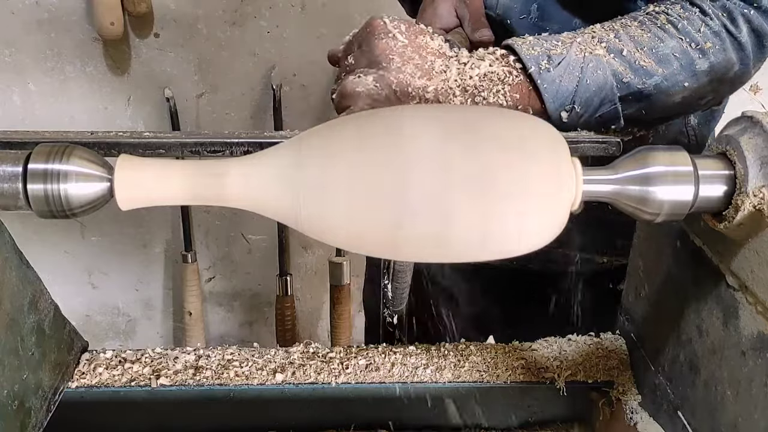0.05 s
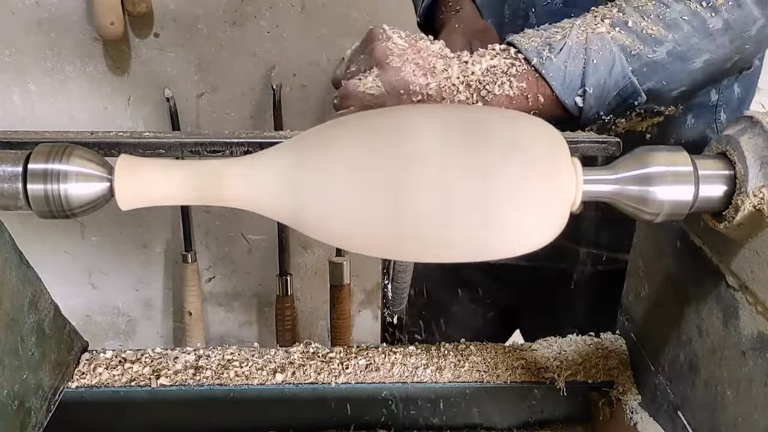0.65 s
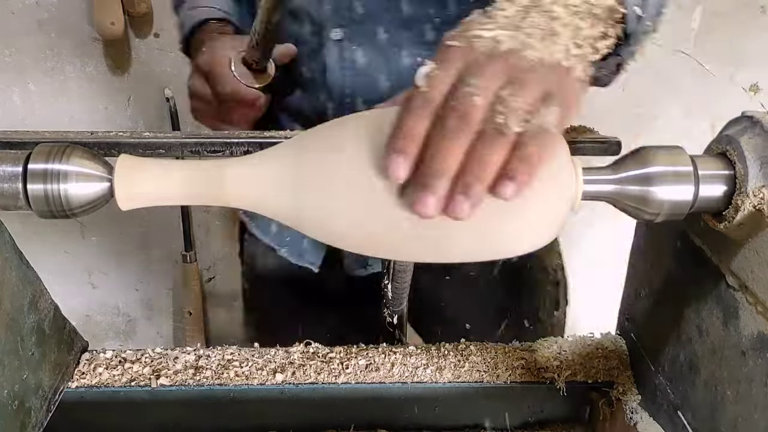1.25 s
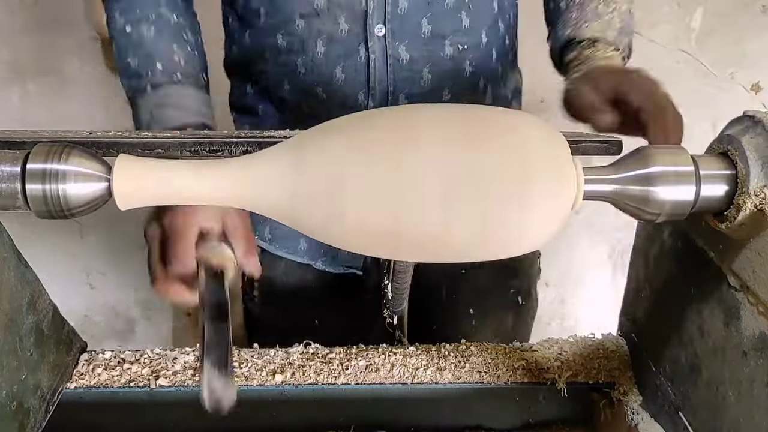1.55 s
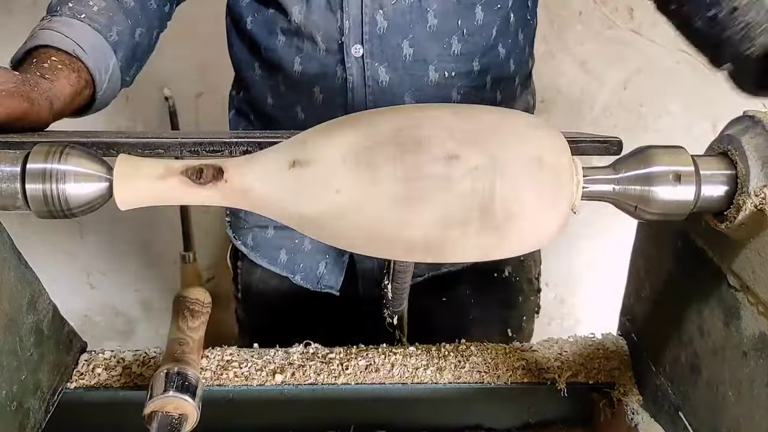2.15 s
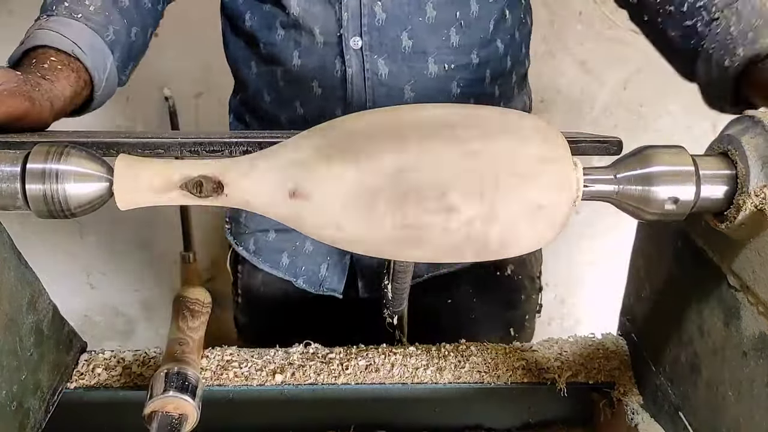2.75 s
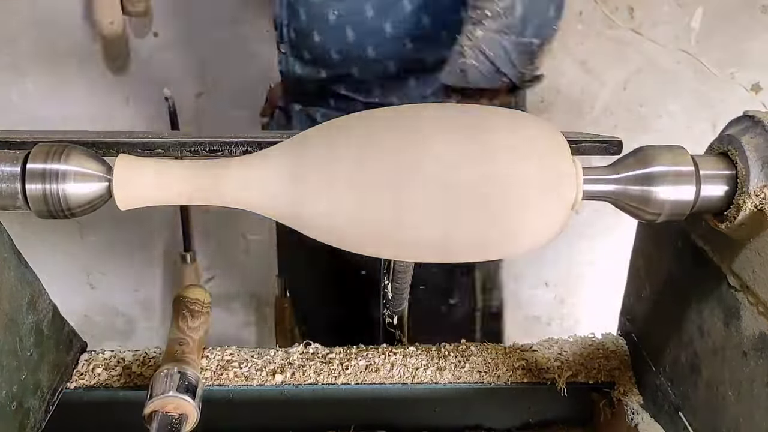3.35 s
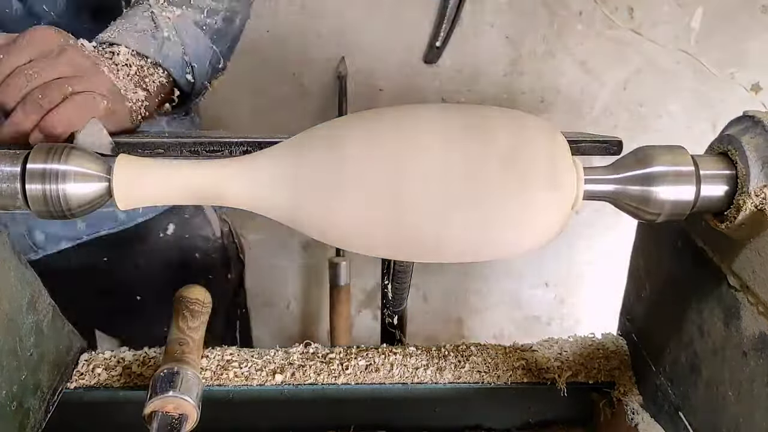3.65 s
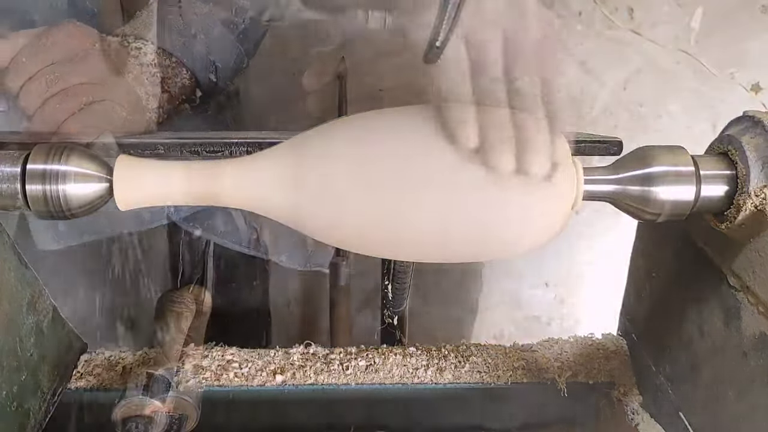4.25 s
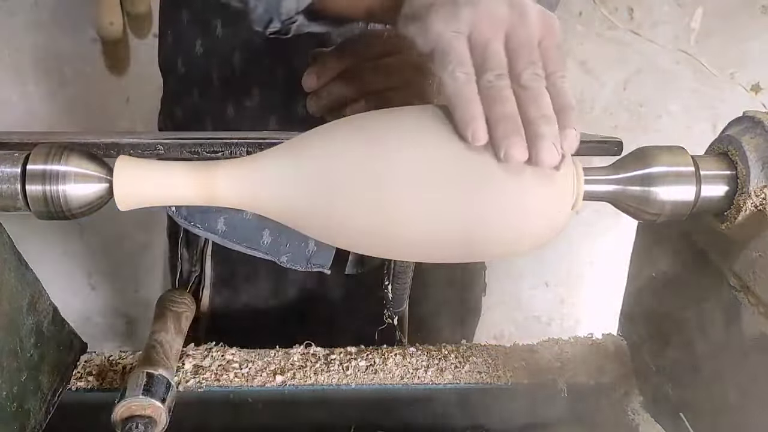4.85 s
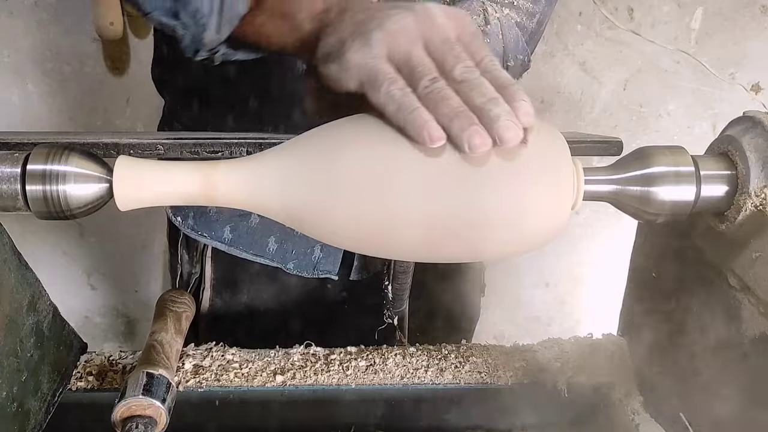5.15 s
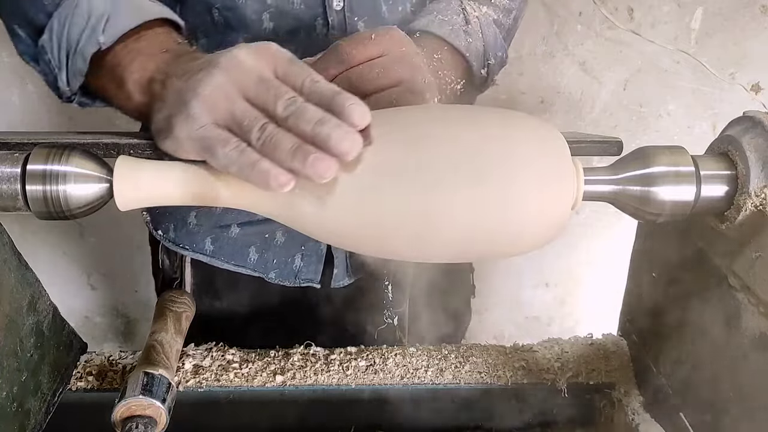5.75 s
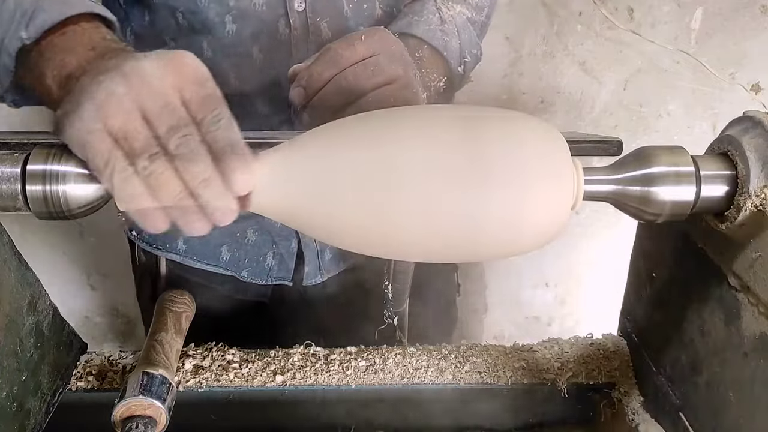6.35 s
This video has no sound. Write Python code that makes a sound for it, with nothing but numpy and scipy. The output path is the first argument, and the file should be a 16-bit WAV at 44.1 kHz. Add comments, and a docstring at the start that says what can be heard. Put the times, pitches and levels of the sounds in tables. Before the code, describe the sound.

Light, hissing chisel cuts sound over the hum and rattle of a wood lathe, heard up close in a small workshop. After one sharp metal clack the machine runs down, leaving dull bumps, faint squeaks and low room noise. It restarts with a brief belt grunt. The wood is scraped twice as a high sandpaper hiss builds, turning shrill under pressure before it softens.

```python
"""A small workshop, close to a belt-driven wood lathe. Its motor hums, its belt and bearings rattle, and
a gouge (a curved chisel) hisses through light cuts. A steel tool is laid down with a clack, the motor is
switched off, and the wood coasts with soft bumps and thin squeaks. The belt grunts as the motor starts
again. The wood is scraped twice and sandpaper hisses along it, over the low noise of the room."""
import sys
import numpy as np
from scipy import signal
from scipy.fft import rfft, irfft
from scipy.io import wavfile
from scipy.ndimage import map_coordinates

SR = 44100
rng = np.random.default_rng(int(sys.argv[2]) if len(sys.argv) > 2 else 0)


def transcribe(u):
    """Save the signal u as a 16-bit wav file named by the first command-line argument.

    u: samples, shape (n,) or (channels, n), limited to [-1, 1]; the rate is SR.
    q: integer samples, one column per channel.
    """
    v = np.clip(np.atleast_2d(u).T, -1, 1)
    q = np.round(v * 32767).astype(np.int16)
    wavfile.write(sys.argv[1], SR, q)


N = 285768
T = np.arange(N) / SR
FREQS = np.maximum(np.arange(N // 2 + 1) * SR / N, 1)
OFF_S, ON_S = 1.775, 3.32  # the motor is switched off, then on again


def motor():
    """Magnetic forces make the motor hum and whine. The tones shift with the load and stop with the power."""
    # the wavering hum after the restart: time_s, level_db
    hum_levels = [(3.33, -41), (3.38, -35.5), (3.7, -43), (3.73, -37), (3.93, -34.5), (3.99, -43),
                  (4.22, -50), (4.27, -35), (4.36, -42), (4.56, -33.5), (4.68, -46), (4.72, -38.5),
                  (5.0, -42), (5.03, -37.5), (5.89, -38.5), (6.01, -44), (6.05, -37.5), (6.25, -47.5),
                  (6.36, -45), (6.48, -52)]
    # weak tones of the frame: pitch_hz, cutting_db, sanding_db, left_lead_rad
    frame_tones = [(62, -66, -58, .3), (398.6, -59, -48, .3), (492, -60, -53, .3), (586.8, -52, -62, .3),
                   (748.5, -63, -54, .3), (841, -57, -50, .3), (852, -49, -62, .3), (869, -42, -60, 2.5),
                   (957, -49, -62, 2.5), (968, -48, -58, .3), (1120, -57, -51, .3), (1152, -60, -54, .3)]
    ramp_s, sanding = 0.025, load()
    power = np.clip(np.maximum(OFF_S - T, T - ON_S) / ramp_s + .5, 0, 1)
    hum_db = np.where(T < (OFF_S + ON_S) / 2, -35.5, curve(hum_levels)[0])
    hum = undb(hum_db) * tone(200.8 - 1.6 * sanding, side_db=5.5, lead=0, wobble=.053, flutter_db=.26)

    def gain(cutting_db, sanding_db):
        return undb(cutting_db) * (1 - sanding) + undb(sanding_db) * sanding

    # the whine of the motor's slots flares at the restart and sinks while the scrapes drag on the wood
    surge = undb(8 * fade(ON_S, t60=.6) * (T > OFF_S + ramp_s))
    drag = undb(-6 * swell(start=3.65, length=1.1))
    whine = gain(-39, -43) * tone(791.3, side_db=5.5, lead=0, wobble=.12, flutter_db=1.4)
    upper_whine = gain(-58, -33.5) * tone(891.4, side_db=5, lead=1.3, wobble=.036, flutter_db=.5)
    belt = gain(-35, -48) * tone(913.5, side_db=5.5, lead=2.4, wobble=.12, flutter_db=.5)
    tones = whine * surge * drag + upper_whine + belt
    for hz, cutting_db, sanding_db, lead in frame_tones:
        tones += gain(cutting_db, sanding_db) * tone(hz, side_db=4.5, lead=lead, wobble=.5, flutter_db=1.3)
    ease_off = undb(-28 * np.maximum(T - 6.15, 0))  # 28 dB a second, near the end
    return (hum + tones * ease_off) * power


def drive():
    """Belt and bearings rattle and ring the metal housing, which throbs with the motor's uneven pull."""
    # tone colour of the rattle: pitch_hz, level_db
    rattle_colour = [(50, -30), (100, -21), (170, -9.5), (290, -8.5), (640, -9), (900, -3.5), (1400, -11.5),
                     (2000, -10), (3400, -14), (4200, -21), (6000, -21), (8500, -18.5), (10500, -67),
                     (15000, -79)]
    # resonances of the housing, running freely and braked by sanding: pitch_hz, width_hz, level_db
    housing_free = [(171, 25, -5), (516, 64, -5.5), (874, 210, 0), (1127, 120, -4), (1997, 200, -11.5),
                    (2476, 160, -13)]
    housing_loaded = [(169.5, 29, -6), (565, 110, -6.5), (781, 63, 0), (917, 52, 2), (1147, 110, -1.5),
                      (2000, 260, -10.5), (2530, 240, -9)]
    throb_hz = 100.4  # half the pitch of the hum
    throb = undb(2.1 * np.sin(2 * np.pi * throb_hz * T) + .58 * walk(70))
    rattle = colour(diffuse(grit(rate=9000, spread_db=1.5)), rattle_colour)
    knocks = diffuse(grit(rate=3000, spread_db=1.5) * throb)
    ringing = resonate(knocks, housing_free) * (1 - load()) + resonate(knocks, housing_loaded) * load()
    rattle_db = np.interp(T, [OFF_S, ON_S], [-33, -34])
    ringing_db = np.interp(T, [OFF_S, ON_S], [-35, -38])
    motion = speed() ** .84 + undb(-28.5)  # a faint rattle stays while the wood coasts
    return motion * (undb(rattle_db) * rattle + undb(ringing_db) * ringing)


def sandpaper():
    """Sharp grains tear at the wood, shriller when pressed; coarse grains add a rasping hiss."""
    # how hard the hand presses, as loudness: time_s, level_db, left_minus_right_db
    pressure = [(3.15, -62, -2.0), (3.2, -51, -1), (3.36, -41.5, 0), (3.8, -34.5, 1), (3.86, -27.5, -4.5),
                (4.01, -26.5, -1), (4.07, -30, 1.5), (4.22, -26.5, 0.5), (4.32, -27.5, 2), (4.42, -29, 1),
                (4.69, -27, -1), (4.9, -22, 1), (5.12, -21, -1.5), (5.31, -18, 0.5), (5.48, -20, -1.5),
                (5.75, -25.5, -2), (6.09, -23, -2), (6.2, -20, -0.5), (6.4, -31.5, -5.0), (6.48, -33, -3.0)]
    # tone colour of the main hiss: pitch_hz, level_db
    hiss_colour = [(1500, -30), (3000, -24.5), (4200, -18), (5500, -15), (6500, -8), (7500, -4),
                   (8300, -0.5), (9000, -2.5), (9700, -7.5), (10500, -17.5), (12500, -20.5), (15500, -49)]
    # bands of the rasping hiss, a shrill sizzle and a dusty top: pitch_hz, width_hz, level_db
    rasp_bands = [(3400, 500, -22), (4600, 700, -20), (5500, 900, -15.5), (6400, 700, -13),
                  (7200, 700, -11.5), (11000, 1500, -18)]
    shrill_band = [(8760, 1770, 0)]
    dusty_band = [(13800, 3000, 0)]
    # the hollow under the hand rings higher as the grip tightens: time_s, pitch_hz
    hollow_pitch = [(3.9, 7400), (4.7, 7500), (5.05, 7900), (5.3, 8550), (5.5, 8050), (5.9, 7900),
                    (6.25, 7550), (6.48, 7450)]
    # where each part of the hiss is heard: pitch_hz, left_minus_right_db
    hiss_sides = [(3000, 2), (5500, -0.5), (7200, -3), (8000, -2), (8900, 8.5), (10500, 0), (14000, 1)]
    level_db, side_db = curve(pressure)
    neck = swell(start=5.48, length=.75)  # the paper slides down to the narrow part of the piece
    firm_db = -18.5  # at this level the sizzle is as strong as the main hiss
    shrill_gain = undb(.94 * (level_db - firm_db))
    grains = colour(grit(rate=16000, spread_db=.5), hiss_colour)
    fine = grit(rate=20000, spread_db=1)
    coarse = grit(rate=1900, spread_db=1.5)
    # each band of the rasping hiss wavers in level at random
    rasp = sum(undb(db + 1.5 * walk(18)) * resonate(coarse, [(hz, width, 0)])
               for hz, width, db in rasp_bands)
    sizzle = shrill_gain * resonate(fine, shrill_band)
    dust = undb(-15 + 4.5 * neck) * resonate(fine, dusty_band)
    hiss = (grains + sizzle + dust + undb(3.5 * neck) * rasp) / np.sqrt(1 + shrill_gain ** 2)
    hollow = glide(grit(rate=6000, spread_db=1), curve(hollow_pitch)[0], width=700)
    hiss = reflect(shade(hiss + hollow * undb(-7) * pan(-8), hiss_sides))
    hiss /= np.std(hiss.mean(axis=0))
    flicker_db = .65 * walk(220) + .35 * walk(45)
    touching = np.clip((T - pressure[0][0]) / .022, 0, 1)
    return hiss * undb(level_db + flicker_db) * pan(side_db) * touching


def gouge():
    """The edge peels fine shavings that spray against the lathe's base."""
    # cuts and light touches: start_s, end_s, attack_s, level_db, left_minus_right_db
    cuts = [(-.17, 0.146, 0.33, -25, -2), (0.137, 0.39, 0.12, -26.5, 0.5), (0.48, 1.094, 0.34, -30.5, 0),
            (1.22, 1.47, 0.092, -43, 0), (1.968, 2.088, 0.061, -40.5, 4)]
    # tone colour of the shavings: pitch_hz, level_db
    chip_colour = [(1500, -10.5), (3400, -8.5), (4100, -12), (4700, -3), (5600, -5), (6100, -6.5),
                   (6700, -1), (7700, 2), (8300, -1), (8950, 2.5), (9600, -7), (10300, -17), (11500, -11.5),
                   (12400, -23), (14500, -17), (15500, -24)]
    # where each part of their hiss is heard: pitch_hz, left_minus_right_db
    chip_sides = [(3000, -1), (5500, -3.5), (6700, -5.5), (7600, -9.5), (8300, -6), (8950, 9), (10500, 2),
                  (14000, 0)]
    chips = shade(colour(grit(rate=9000, spread_db=-1), chip_colour), chip_sides)
    cutting = sum(undb(db) * stroke(start, end, attack, release=.064) * pan(side_db)
                  for start, end, attack, db, side_db in cuts)
    spray = undb(-43.5) * speed() * (T < ON_S)  # loose shavings fly between cuts too
    return reflect(chips) * np.hypot(cutting, spray) * undb(1.2 * walk(45.06))


def scrapes():
    """Hard, coarse contact chatters on the wood: a rasp bites and slackens while a hollow note builds."""
    # the two scrapes: start_s, end_s, attack_s, rasp_db, body_db
    strokes = [(3.838, 4.04, .12, -20.5, -30), (4.142, 4.418, .025, -25, -28.5)]
    # high and low resonances of the wood: pitch_hz, width_hz, level_db
    rasp_modes = [(1690, 260, -1), (2050, 260, 5.5), (2320, 280, 4), (2640, 320, 4.5), (3350, 600, -6),
                  (4700, 2400, -10)]
    body_modes = [(440, 150, -0.5), (700, 88, 0.5), (965, 360, 3)]
    chatter = diffuse(grit(rate=1500, spread_db=1.5))
    rasp = resonate(chatter, rasp_modes) * pan(-1.8)
    body = resonate(chatter, body_modes)
    out = np.zeros((2, N))
    for start, end, attack, rasp_db, body_db in strokes:
        sag_db = 42 * np.maximum(T - start, 0)
        out += rasp * undb(rasp_db - sag_db) * stroke(start, end, attack, release=.03)
        out += body * undb(body_db) * stroke(start, end, attack=.1, release=.03)
    return out * undb(1.1 * walk(80))


def clack():
    """Steel hits the tool rest, bounces and is damped by the hand; the lathe and walls echo briefly."""
    # the hit and its bounces: start_s, level_db
    hits = [(1.6845, -3), (1.6853, -4), (1.6881, -17)]
    # tone colour of the dry crack of steel on steel: pitch_hz, level_db
    crack_colour = [(500, -16), (3000, -10), (4200, -9), (6500, 0), (9200, 0), (10000, -9), (15000, -25)]
    # ringing notes of the tool and its rest: pitch_hz, decay_s, level_db
    steel_modes = [(620, .015, -22), (1040, .015, -20), (2315, .075, -21.5), (2450, .014, -10),
                   (3079, .07, -25), (3400, .05, -26), (4000, .008, -19), (5050, .009, -11),
                   (5900, .008, -10), (6500, .006, -10), (7750, .007, -6), (8450, .008, -1.5),
                   (8900, .008, -2.5)]
    contact_s = .0005
    out = np.zeros((2, N))
    for start, hit_db in hits:
        contact = undb(hit_db) * np.clip((T - start) / contact_s, 0, 1)
        crack = undb(-5.5) * colour(rng.standard_normal((2, N)), crack_colour) * fade(start, t60=.006)
        steel = [sum(undb(db) * ring(start, hz, t60, phase) for hz, t60, db in steel_modes)
                 for phase in (0, np.pi / 2)]  # left, right
        out += contact * (crack + np.array(steel))
    tail = unit(rng.standard_normal((2, N)) * fade(0, t60=.1)) / np.sqrt(N)
    echo = irfft(rfft(out) * rfft(tail), N)
    return (out + undb(-20) * echo) * pan(-.6)


def coasting():
    """With the power off, the turning shaft bumps dully through the base and gives stuttering squeaks."""
    # dull bumps: start_s, level_db, pitch_hz, decay_s
    bumps = [(2.012, -24, 60, .07), (2.12, -31, 60, .08), (2.143, -24, 170, .06), (2.148, -29, 70, .07),
             (2.151, -22, 175, .06), (2.238, -26, 130, .04), (2.274, -26.5, 70, .06), (2.343, -31, 90, .05),
             (2.485, -35, 45, .09)]
    # thin squeaks: start_s, level_db, pitch_hz, length_s, left_minus_right_db
    squeaks = [(2.105, -37, 5980, .035, -4), (2.375, -56, 5390, .06, 2), (2.482, -51, 5380, .055, 0),
               (2.785, -40, 4960, .025, -4), (2.806, -39.5, 4960, .015, -4), (2.817, -57, 4930, .03, -4),
               (2.949, -42, 5950, .038, 2), (2.984, -55, 6080, .024, 2)]
    out = pan(-6) * sum(undb(db) * ring(start, hz, t60) for start, db, hz, t60 in bumps)
    waver = 1 + .004 * walk(250)
    stutter = 1 + .2 * walk(160)
    for start, db, hz, length, side_db in squeaks:
        phase = 2 * np.pi * hz * np.cumsum(waver) / SR + np.array([[np.pi / 2], [0]])
        squeak = np.sin(phase) + undb(-12) * np.sin(2 * phase)  # with a faint octave
        out += undb(db) * swell(start, length) * stutter * squeak * pan(side_db)
    return out


def belt_slip():
    """The belt slips and grunts for an instant as the motor starts to pull."""
    # resonances of the grunt: pitch_hz, width_hz, level_db
    grunt_modes = [(560, 130, 0), (190, 60, -7)]
    grunt = resonate(diffuse(grit(rate=2700, spread_db=4.5)), grunt_modes)
    return grunt * undb(-31) * swell(start=3.279, length=.072)


def workshop():
    """The low, gently moving noise of the room, and a rumbling draught from the spinning wood."""
    # tone colour of the room: pitch_hz, level_db
    room_colour = [(25, -17), (60, -3.5), (120, -2), (200, -1.5), (450, -6.5), (750, -11), (1200, -20.5),
                   (2200, -26.5), (3500, -35.5), (5500, -38), (7500, -30), (9200, -36.5), (10500, -54),
                   (15000, -60)]
    air = colour(diffuse(rng.standard_normal((2, N))), room_colour)
    draught = resonate(rng.standard_normal((2, N)), [(38, 140, 0)])
    shielded = np.clip((T - 3.9) / .5, 0, 1)  # the hand covers the wood
    air_db = -41.1 + .5 * walk(5.08) - 3.5 * shielded
    draught_db = -57.5 + 2.5 * walk(7) - 16 * shielded
    return air * undb(air_db) + draught * undb(draught_db)


def speed():
    """Speed of the drive, 0-1: it runs down after the switch-off and jumps back at the restart."""
    run_down_s, spin_up_s = .34, .06
    return np.clip(np.maximum(1 - (T - OFF_S) / run_down_s, .5 + (T - ON_S) / spin_up_s), 0, 1)


def load():
    """How hard the sanding brakes the motor, 0-1."""
    start_s, rise_s = 3.556, 1.32
    return np.clip((T - start_s) / rise_s, 0, 1)


def reflect(pair):
    """Hiss bounces off the base and the tool rest, along paths that drift as the hand moves."""
    # echo delays, a row for left and a row for right: first_s, second_s
    echo_delays = [(.0013, .0031), (.0017, .0026)]
    drift_s = .00004
    out = []
    for x, delays in zip(pair, echo_delays):
        echoes = sum(map_coordinates(x, [(T - delay - drift_s * walk(3)) * SR], mode="mirror")
                     for delay in delays)
        out.append(x + undb(-11) * echoes)
    return unit(np.array(out))


def diffuse(pair):
    """Blend two noises into a surrounding sound: alike in the bass, where the motor's side is louder."""
    # how left and right compare: pitch_hz, likeness (0-1), left_minus_right_db
    stereo_field = [(25, .4, 0), (60, 1, 3), (200, 0.9, 6), (354, 0.87, 4), (820, 0.1, 2.5), (1300, 0, 1.5),
                    (2420, 0, 0.5), (4660, 0, -2.5), (15000, 0, -5)]
    likeness, side_db = over_hz(stereo_field)
    likeness = np.clip(likeness, -.99, .99)
    a, b = rfft(pair)
    mid, side = a * np.sqrt(1 + likeness), b * np.sqrt(1 - likeness)
    return unit(irfft(np.array([mid + side, mid - side]) * pan(side_db), N))


def grit(rate, spread_db):
    """Tiny uneven impacts, about `rate` a second; each has its own sign and strength left and right."""
    hits = (rng.random(N) < rate / SR) * undb(spread_db * np.minimum(rng.exponential(size=N), 4))
    return unit(hits * rng.standard_normal((2, N)))


def tone(hz, side_db, lead, wobble, flutter_db):
    """A wavering machine tone. Its phase wanders by `wobble` and is `lead` ahead on the left (radians)."""
    phase = 2 * np.pi * np.cumsum(hz * np.ones(N)) / SR + wobble * walk(9)
    wave = np.sqrt(2) * np.sin(phase + np.array([[lead], [0]]))
    return wave * pan(side_db) * undb(flutter_db * walk(14))


def ring(start, hz, t60, phase=0):
    """One struck note that dies away by 60 dB in t60 seconds."""
    out = np.zeros(N)
    live = slice(int(start * SR), int((start + 2 * t60) * SR))
    age = T[live] - T[live][0]
    out[live] = np.sin(2 * np.pi * hz * age + phase) * np.exp(-np.log(1000) * age / t60)
    return out


def resonate(x, modes):
    """Pass a sound through resonances (pitch_hz, width_hz, level_db), at rms 1."""
    body = sum(undb(db) / (1 + 1j * (FREQS ** 2 - hz ** 2) / (FREQS * width)) ** 2
               for hz, width, db in modes)
    return unit(irfft(rfft(x) * body, N))


def glide(x, hz, width):
    """A resonance whose pitch moves."""
    centre = np.mean(hz)
    band = signal.hilbert(resonate(x, [(centre, width, 0)]))
    return np.real(band * np.exp(2j * np.pi * np.cumsum(hz - centre) / SR))


def colour(x, rows):
    """Give a sound a tone colour (pitch_hz, level_db), at rms 1."""
    return unit(irfft(rfft(x) * undb(over_hz(rows)[0]), N))


def shade(pair, rows):
    """Colour left and right differently (pitch_hz, left_minus_right_db)."""
    return irfft(rfft(pair) * pan(over_hz(rows)[0]), N)


def stroke(start, end, attack, release):
    """Rise from the start, hold until the end, then let go; all in seconds."""
    return np.clip(np.minimum((T - start) / attack, 1 - (T - end) / release), 0, 1)


def swell(start, length):
    """A smooth rise and fall, timed in seconds."""
    return np.sin(np.pi * np.clip((T - start) / length, 0, 1)) ** 2


def fade(start, t60):
    """Stay at 1 until the start, then fall by 60 dB every t60 seconds."""
    return np.exp(-np.log(1000) * np.clip((T - start) / t60, 0, 10))


def walk(rate):
    """A random wander around zero that turns `rate` times a second."""
    knots = rng.standard_normal(4096)
    return 1.6 * np.interp(T * rate, np.arange(len(knots)), knots)


def curve(rows):
    """The columns of a time table, one value a sample."""
    times, *columns = np.transpose(rows)
    return [np.interp(T, times, column) for column in columns]


def over_hz(rows):
    """The columns of a pitch table, one value for each of FREQS."""
    hz, *columns = np.transpose(rows)
    return [np.interp(np.log(FREQS), np.log(hz), column) for column in columns]


def pan(db):
    """Left and right gains; positive decibels lean left."""
    return undb(np.array([[.5], [-.5]]) * db)


def undb(db):
    """Decibels to gain."""
    return np.exp(np.asarray(db) * np.log(10) / 20)


def unit(x):
    """Scale to an average strength (rms) of 1."""
    return x / np.sqrt(np.mean(x ** 2))


def scene():
    """Machine, hand work and room together; the machine strains louder during the firmest sanding."""
    strain = undb(1.7 * swell(start=4.87, length=1.43))
    machine = (motor() + drive()) * strain + belt_slip() + coasting()
    hands = gouge() + sandpaper() + scrapes() + clack()
    return machine + hands + workshop()


def record(dry):
    """Clip peaks at full scale and cut the highest treble."""
    top_hz = 15500
    return signal.sosfilt(signal.ellip(10, .1, 80, top_hz, fs=SR, output="sos"), np.clip(dry, -1, 1))


dry = scene()
out = record(dry)
transcribe(out)
```